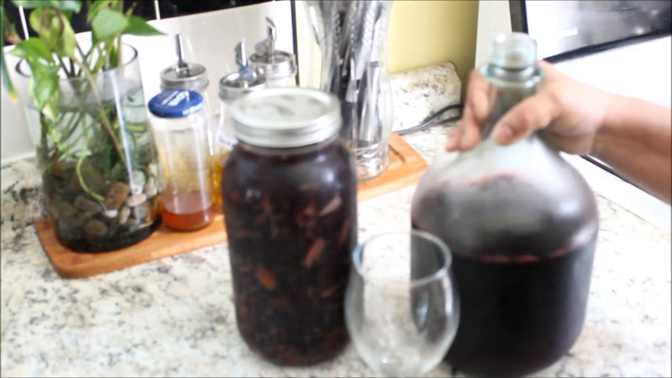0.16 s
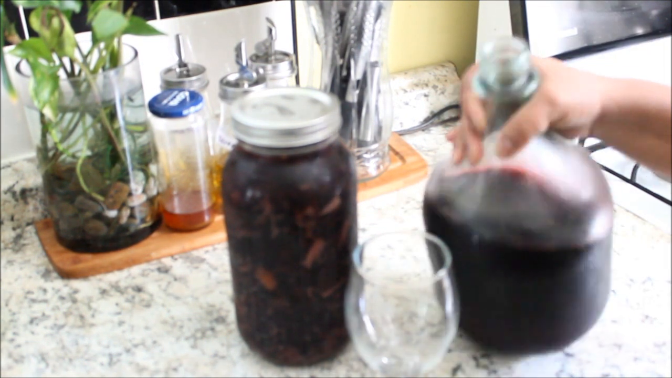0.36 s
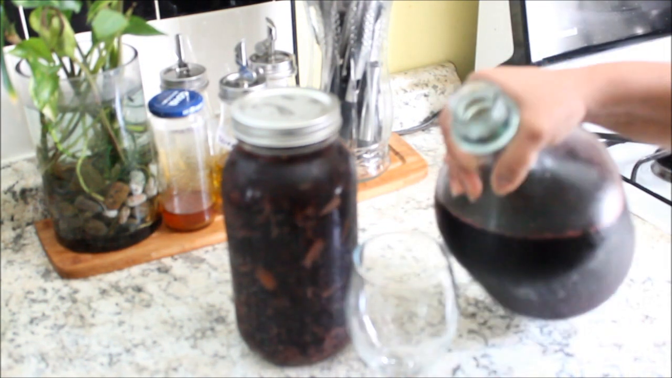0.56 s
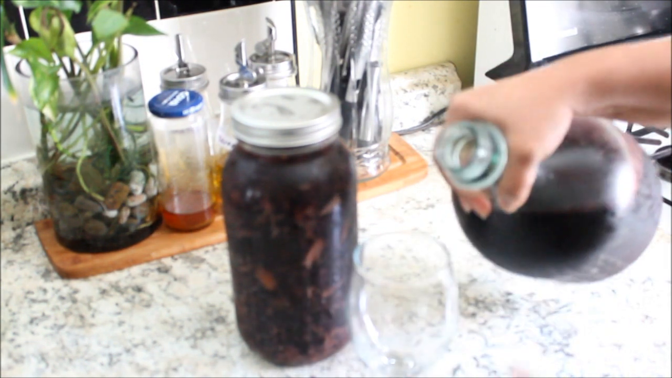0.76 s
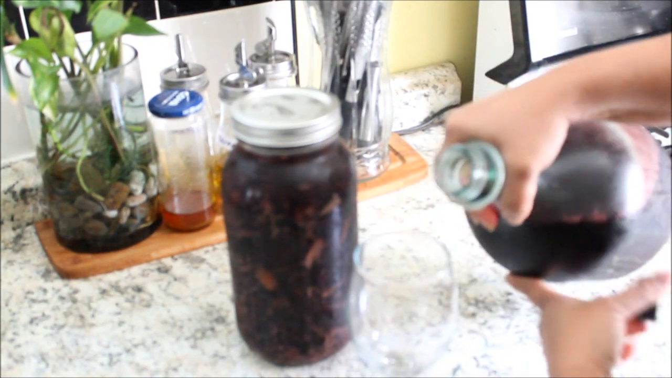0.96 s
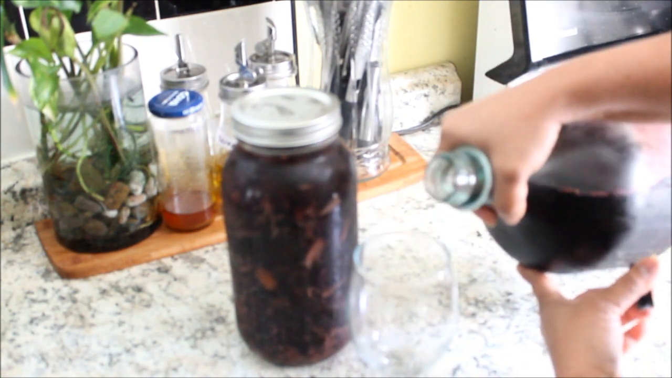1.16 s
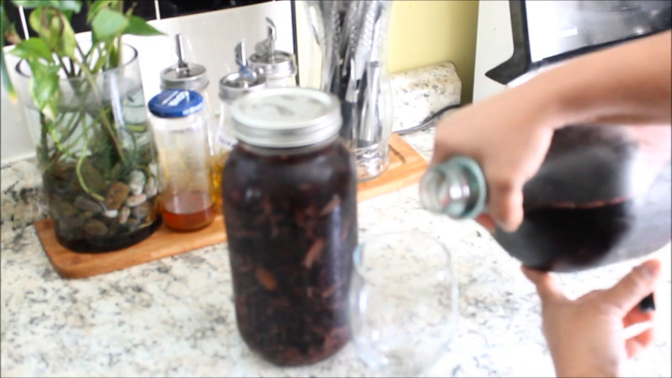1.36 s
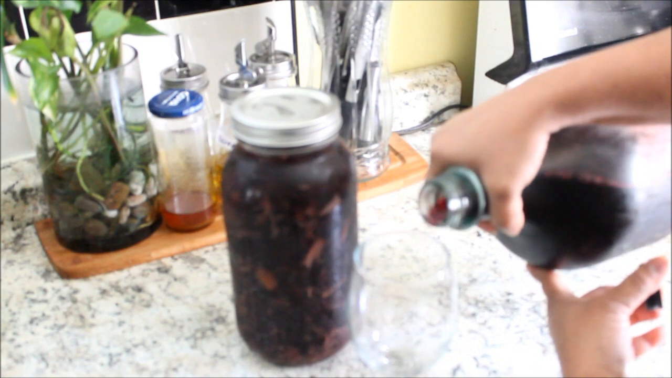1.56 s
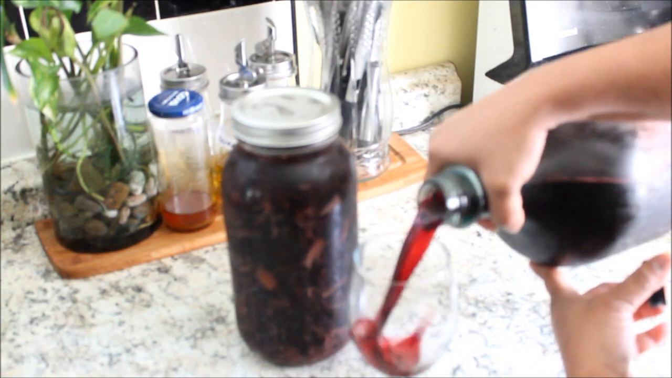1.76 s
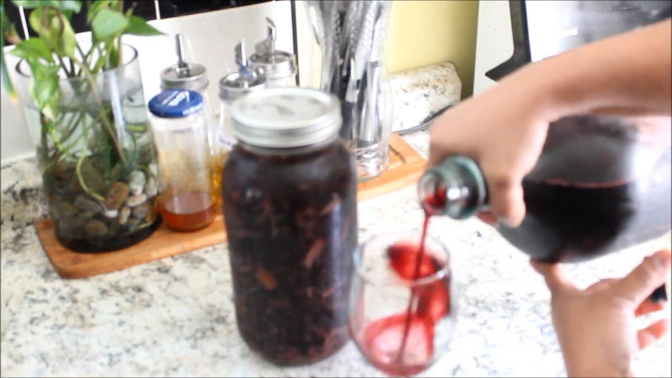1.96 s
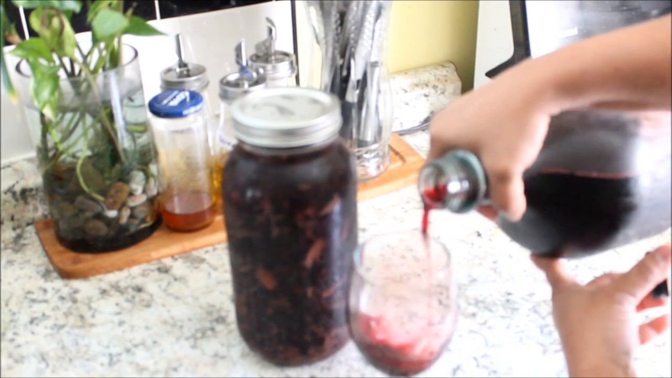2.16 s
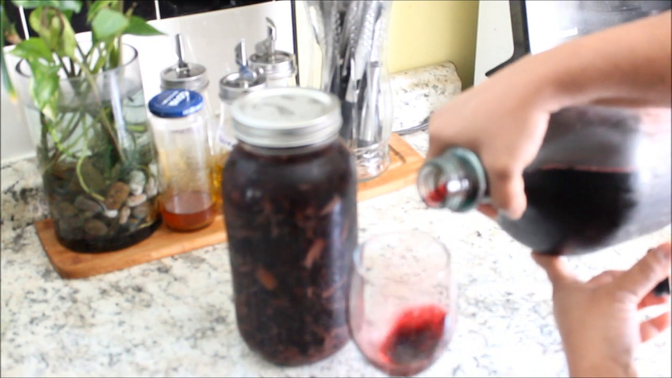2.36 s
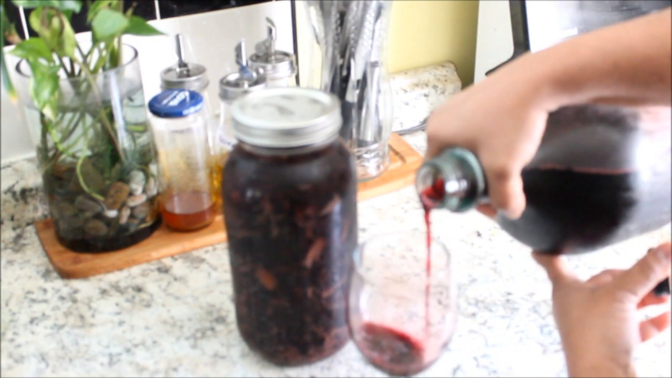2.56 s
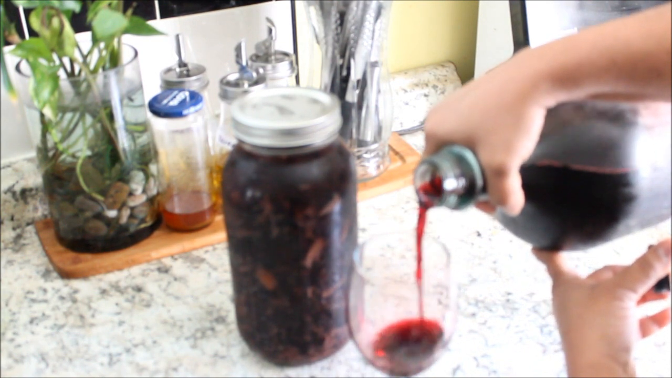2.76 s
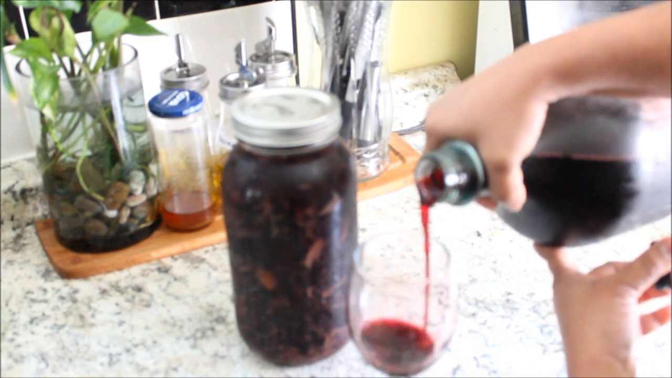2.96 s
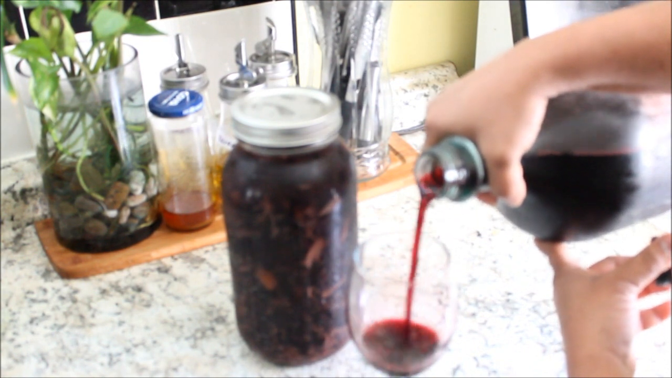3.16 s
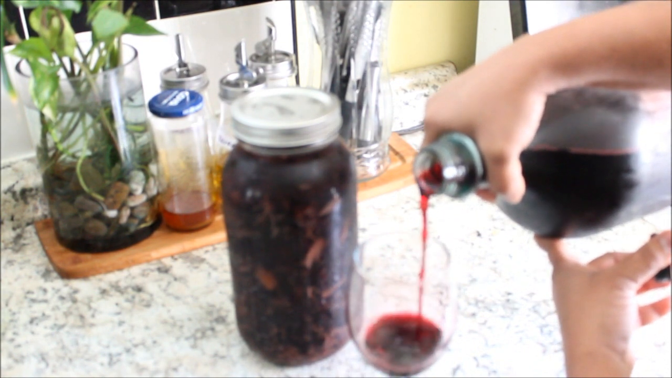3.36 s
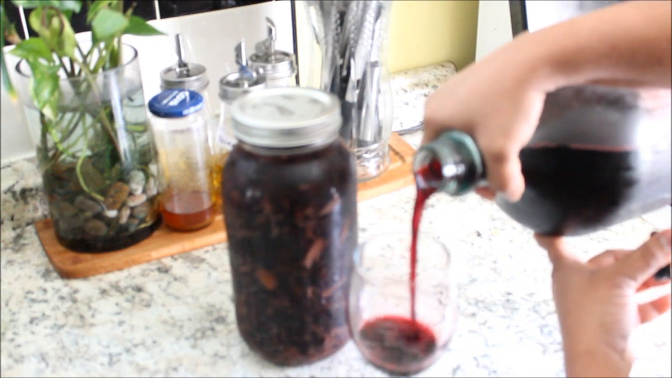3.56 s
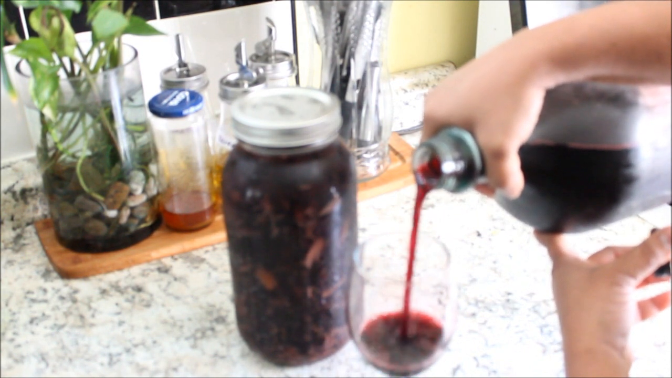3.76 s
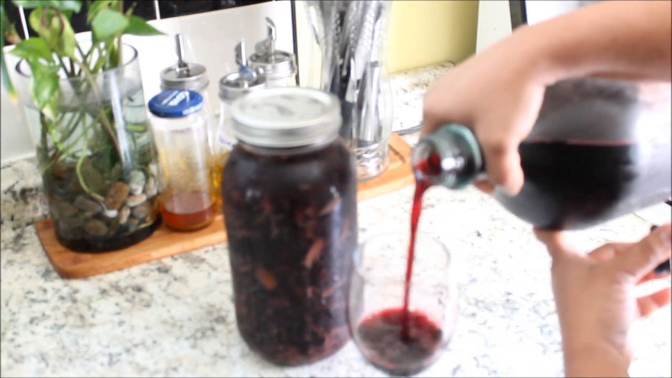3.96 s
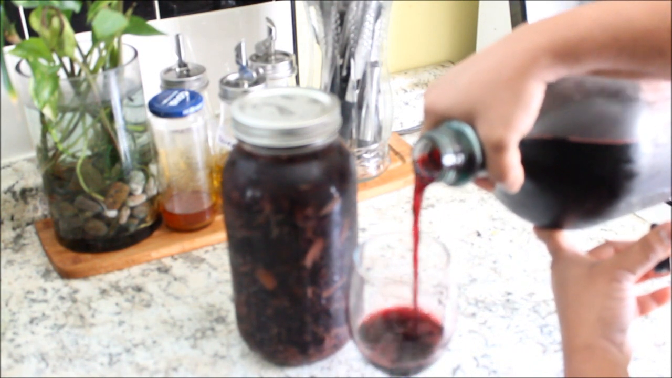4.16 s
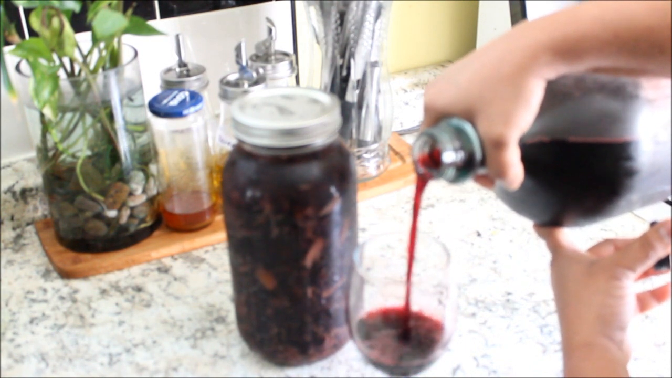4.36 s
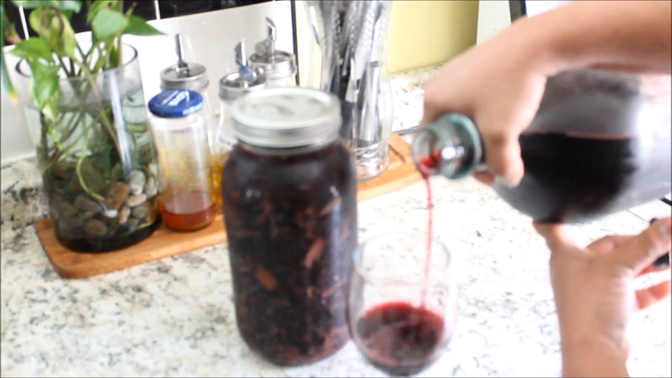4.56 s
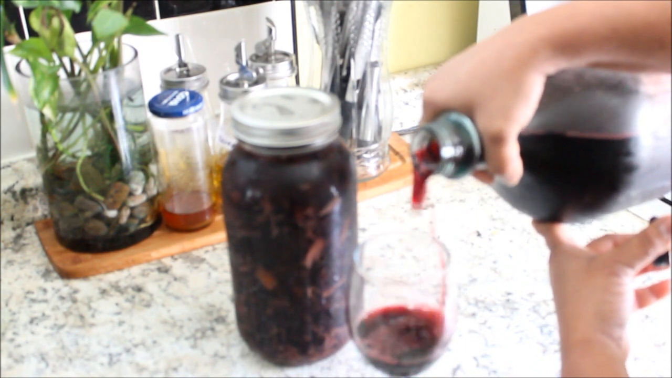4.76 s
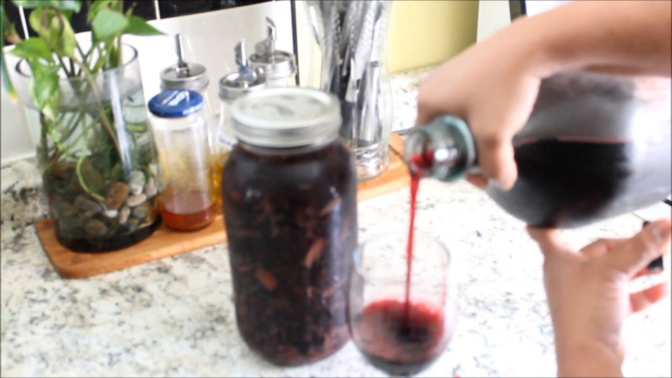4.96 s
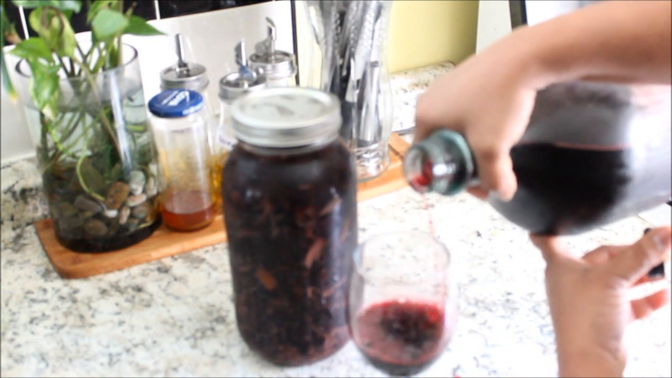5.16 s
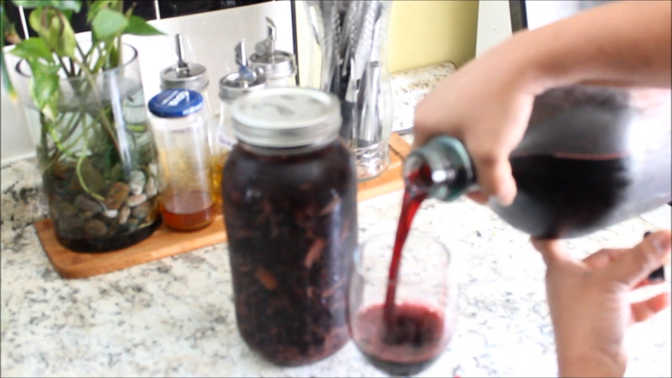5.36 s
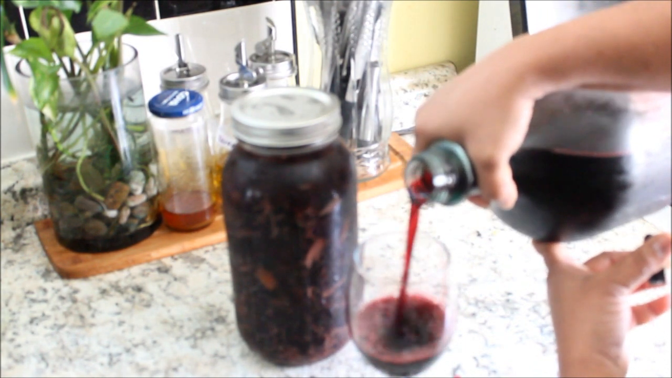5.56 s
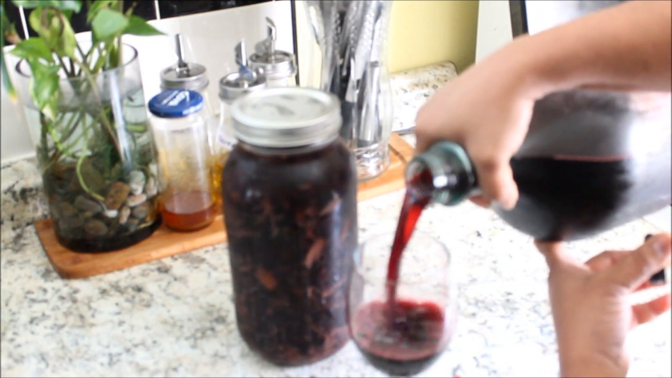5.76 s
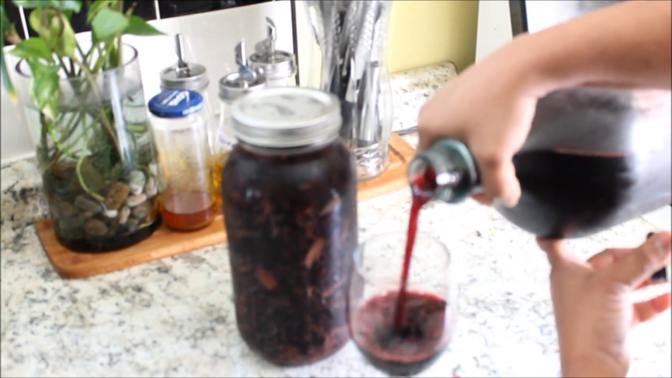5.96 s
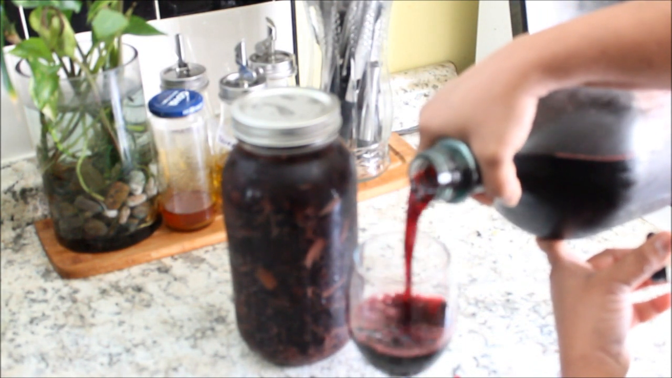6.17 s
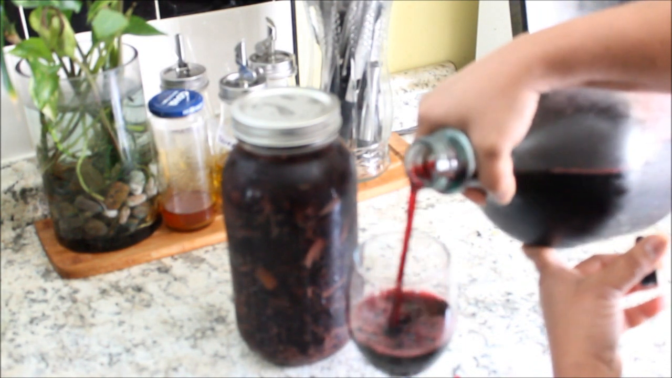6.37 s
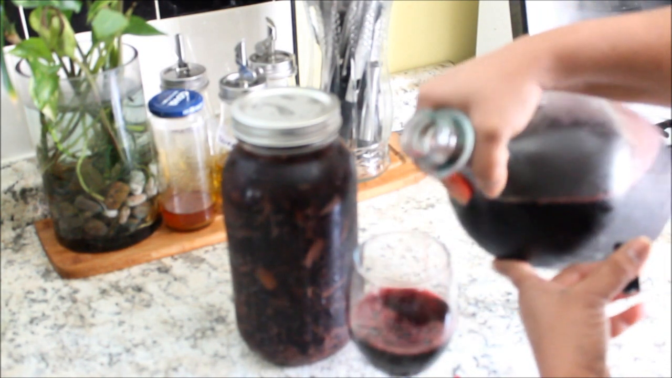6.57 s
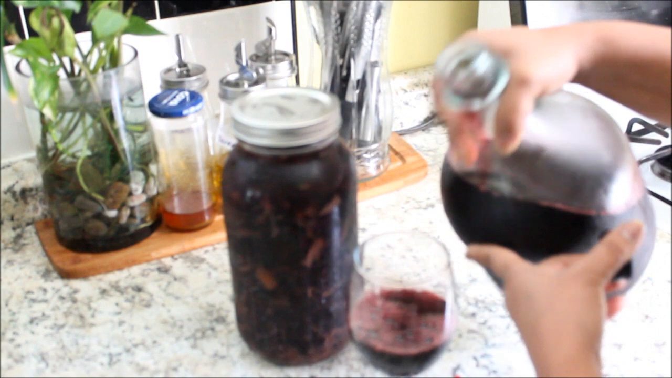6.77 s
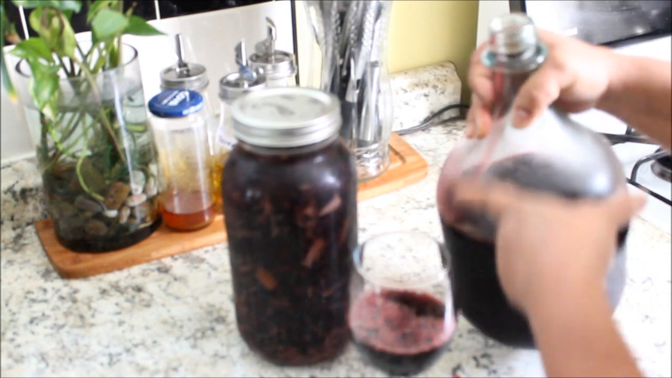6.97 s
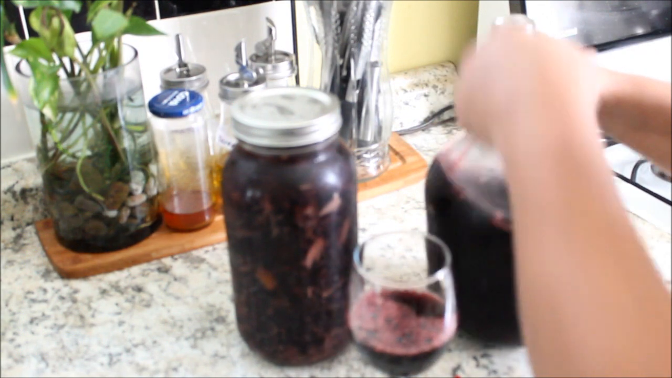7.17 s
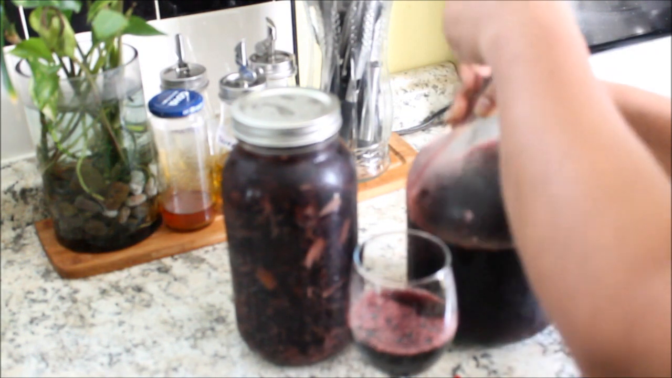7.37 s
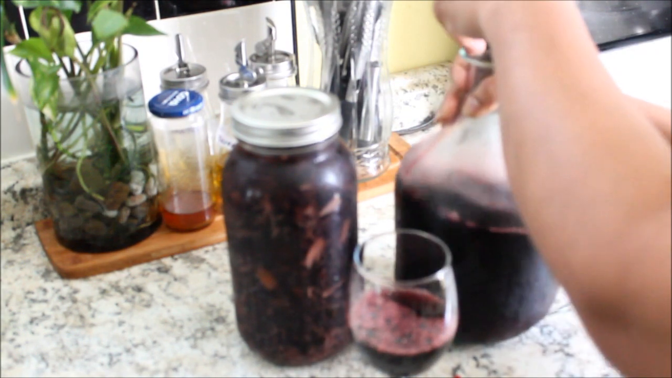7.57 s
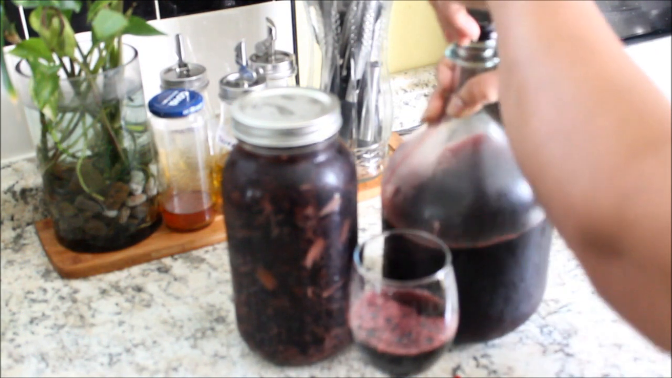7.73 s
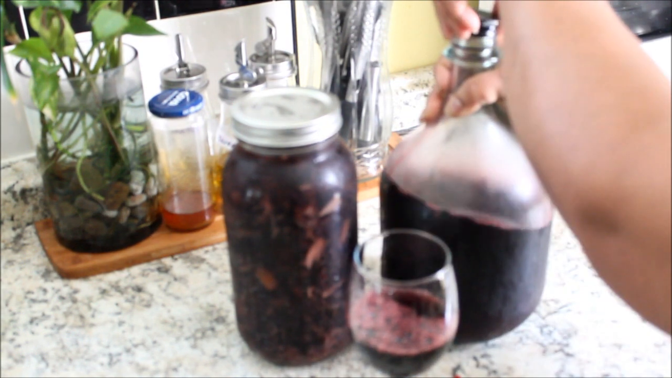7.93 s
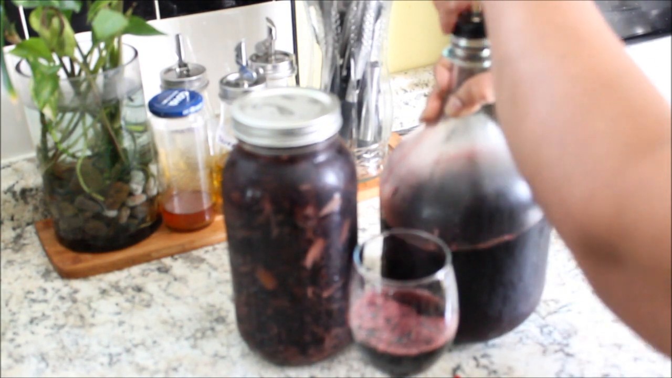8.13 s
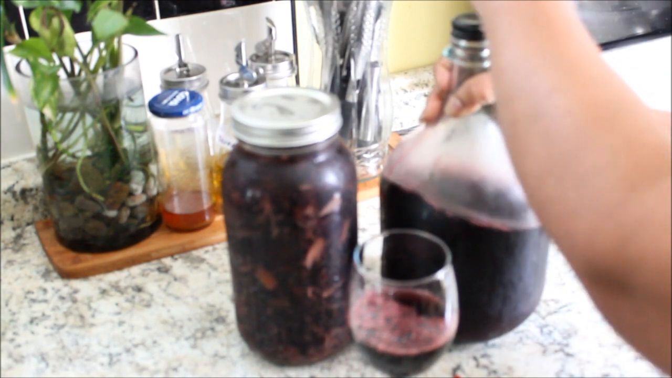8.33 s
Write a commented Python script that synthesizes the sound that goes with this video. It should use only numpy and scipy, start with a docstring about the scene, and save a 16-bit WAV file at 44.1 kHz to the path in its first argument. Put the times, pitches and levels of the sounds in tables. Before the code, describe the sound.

Close view of a small hard-walled kitchen with a low steady appliance hum. Fingers click sharply on a glass jug, its foot scrapes the stone counter, and sleeves rustle. A thin stream then pours unevenly into a glass with bubbly plinks and gurgles. Finally the jug thuds down twice, while its cap taps the lip and grinds on the thread.

```python
"""In a small hard-walled kitchen an appliance hums, made of wavering sines over coloured noise.
Fingers snap on a glass jug, its foot drags over the stone counter, sleeves rustle and a faint hiss follows.
Then a thin stream pours in surges: climbing sines are bubbles, noise bursts are drops, the glass rings along.
At the end the jug lands twice, as struck resonances and fading noise, while its cap knocks on the lip
and is screwed on, as clicks sent through thin-metal resonances."""
import sys
import numpy as np
from scipy import signal
from scipy.fft import rfft, irfft
from scipy.io import wavfile
from scipy.ndimage import map_coordinates

SR = 44100
rng = np.random.default_rng(int(sys.argv[2]) if len(sys.argv) > 2 else 0)


def master_out(mix):
    """Clip the mix to full scale and print it as 16-bit PCM to the path in sys.argv[1]."""
    frames = np.transpose(np.atleast_2d(mix))
    ceiling = np.clip(frames, -1, 1)
    pcm = np.round(ceiling * 32767).astype(np.int16)
    wavfile.write(sys.argv[1], SR, pcm)


N = 370440   # length in samples

# ringing tones of the jug's lip: [f/Hz, strength/dB, time to fade by 60 dB/s]
LIP_MODES = [(2177, -2, .045), (2317, 0, .05), (2464, 0, .045), (2740, -7, .03), (3774, -21, .12),
             (3300, -14, .012), (4300, -17, .012), (4969, -12, .015), (5421, -12, .03), (7084, -12, .02)]


def from_db(db):
    """Turns decibels into a gain: every 20 dB is a factor of ten."""
    return 10 ** (np.asarray(db) / 20)


def rms_one(x):
    """Scales a sound so that its average strength (rms) is 1."""
    return x / np.sqrt(np.mean(x ** 2) + 1e-20)


def in_time(rows):
    """Joins timed points by straight lines, one value a sample; practically silent outside the table."""
    s, *columns = np.transpose(rows)
    t = np.arange(N) / SR
    return [np.interp(t, s, column, left=-150, right=-150) for column in columns]


def at_hz(points, hz):
    """Reads a table between its points on a log-frequency axis, as the ear spaces pitch."""
    table_hz, values = np.array(points).T
    return np.interp(np.log(hz), np.log(table_hz), values)


def coloured(x, spectrum):
    """Weights the frequencies of an even-spectrum sound by a table, then scales it to rms 1."""
    hz = np.arange(len(x) // 2 + 1) * SR / len(x) + 1
    return rms_one(irfft(rfft(x) * from_db(at_hz(spectrum, hz)), len(x)))


def drift(rate):
    """Slow random wandering: a smooth curve through random points, `rate` of them a second."""
    knots = rng.standard_normal(round(N / SR * 60) + 3)
    return map_coordinates(knots, [np.arange(N) / SR * min(rate, 59)], order=3)


def resonate(x, hz, width_hz):
    """One resonance with gain 1 at about its peak: a narrow one rings long, a wide one briefly."""
    r = np.exp(-np.pi * width_hz / SR)
    forward = [(1 - r * r) / 2, 0, (r * r - 1) / 2]
    feedback = [1, -2 * r * np.cos(2 * np.pi * hz / SR), r * r]
    return signal.lfilter(forward, feedback, x + 1e-18)


def grains(per_s, spread_db):
    """Clicks at random moments, of uneven size and random sign, as rough contact makes; rms 1."""
    sizes = from_db(spread_db * np.minimum(rng.exponential(1, N), 5)) * rng.choice([-1, 1], N)
    return rms_one(sizes * (rng.random(N) < per_s / SR))


def add(out, s, sound):
    """Mixes a sound in, starting at a time in seconds."""
    i = round(s * SR)
    out[i:i + len(sound)] += sound[:N - i]


def dying_noise(decay, spectrum):
    """Half a second of noise in half-octave bands, each fading at its own rate."""
    t, out = np.arange(SR // 2) / SR, 0
    for low in 40 * 2 ** np.arange(0, 8.6, .5):
        hz = low * 2 ** .25   # middle of the band
        band_filter = signal.butter(2, [low, low * np.sqrt(2)], "band", fs=SR, output="sos")
        band = signal.sosfilt(band_filter, rng.standard_normal(len(t)))
        out = out + band * from_db(at_hz(spectrum, hz) - 60 * t / at_hz(decay, hz))
    return out / np.sqrt(np.mean(out[:SR // 50] ** 2))   # the first 20 ms have rms 1


def strike(force, modes):
    """A force sets a body's tones ringing; each strength also gets a random change in dB."""
    out = 0
    for hz, db, t60 in modes:
        r, w = from_db(-60 / (t60 * SR)), 2 * np.pi * hz / SR
        ring = signal.lfilter([0, np.sin(w)], [1, -2 * r * np.cos(w), r * r], force)
        out = out + from_db(db + rng.normal(0, 2.94)) * ring
    return out


def slap(db, hz, t60, breadth):
    """A short fading noise burst, twice through one resonance; breadth = width over centre."""
    burst = rng.standard_normal(2000) * from_db(-60 * np.arange(2000) / SR / t60)
    burst = resonate(resonate(burst, hz, hz * breadth), hz, hz * breadth)
    return from_db(db) * burst / np.abs(burst).max()


def strokes(rows, rise_s, sag_db, fall_s):
    """Level curve/dB: each stroke rises 40 dB, sags, falls 40 dB; where strokes overlap the loudest rules."""
    out, t = np.full(N, -150.), np.arange(N) / SR
    for s, length, db in rows:
        corners = [s - rise_s, s, s + length, s + length + fall_s]
        i, j = np.searchsorted(t, [corners[0], corners[-1]])
        shape = np.interp(t[i:j], corners, [-40, 0, -sag_db, -sag_db - 40])
        out[i:j] = np.maximum(out[i:j], db + shape)
    return out


def background():
    """Room noise, and a motor's hum and faint whine: sines that waver in level and phase."""
    # room noise colour: [f/Hz, relative level/dB]
    air_colour = [(15, -62), (25, -35), (65, -25.5), (97, -29.5), (154, -14.5), (176, -18.5), (196, -4),
                  (264, -11.5), (419, -10), (467, -19), (535, -18), (2570, -33), (3030, -34), (10500, -43),
                  (16300, -51.5)]
    # motor tones: [f/Hz, middle rms level/dB]
    hum_tones = [(195.1, -46), (100.5, -67.5), (401, -66.5), (3100, -72)]
    t, hum = np.arange(N) / SR, 0
    for hz, db in hum_tones:
        level = np.sqrt(2) * from_db(db + 1.4 * drift(5.8))   # a sine's peak is sqrt(2) times its rms
        hum = hum + level * np.sin(2 * np.pi * hz * t + 0.42 * drift(7.8))
    air_db = -46.5 + 0.09 * drift(3.94)
    return hum + from_db(air_db) * coloured(rng.standard_normal(N), air_colour)


def rustle():
    """Sleeves and skin slide as dense coloured clicks; resonant noise hisses while the jug tips."""
    # cloth colour: [f/Hz, relative level/dB]
    cloth_colour = [(290, -56), (500, 3.5), (553, -41), (688, -1.5), (795, -5), (1280, -8), (1440, -3.5),
                    (7640, 1), (16000, -21)]
    # one swish a row: [start t/s, length/s, level/dB]
    swishes = [(.04, 0.28, -38), (.5, .17, -39.5), (.96, 0.088, -36.5), (1.22, 0.033, -50),
               (1.45, 0.041, -56), (1.64, 0.024, -57), (1.95, 0.11, -80), (6.85, 0.19, -52),
               (7.08, 0.32, -48.5), (7.425, 0.026, -38), (7.62, 0.3, -51.5), (8.11, 0.017, -54),
               (8.23, 0.095, -54.5)]
    # hiss while the jug tips: [t/s, level/dB]
    tipping_level = [(1.12, -59), (1.156, -61), (1.23, -50), (1.506, -54), (1.63, -66), (1.636, -77),
                     (1.676, -78), (1.7, -71)]
    # resonances of that hiss: [f/Hz, width/Hz, relative level/dB]
    hiss_bands = [(2030, 460, 4), (4070, 300, -7), (3140, 52, -22)]
    noise = rng.standard_normal(N)
    hiss = rms_one(sum(from_db(db) * resonate(noise, hz, width) for hz, width, db in hiss_bands))
    cloth = coloured(grains(9000, spread_db=-1.0), cloth_colour)
    cloth_db = strokes(swishes, rise_s=0.35, sag_db=2.5, fall_s=.22) + 0.16 * drift(15)
    return from_db(cloth_db) * cloth + from_db(in_time(tipping_level)[0]) * hiss


def snaps():
    """Fingers on glass and cap: a sharp click rings around its centre, with noise and a bright edge."""
    # one snap a row: [t/s, level of the ring/dB, centre f/Hz, bright edge relative to the ring/dB]
    snap_rows = [(0.0353, -13.5, 3600, -28), (.0423, -15.5, 3600, -5), (0.123, -17.5, 6960, -12),
                 (0.162, -16, 1510, -2), (0.5367, -17.5, 2870, -35), (0.981, -22.5, 2930, -9),
                 (1.061, -17.5, 1490, 0.5), (1.83, -38, 10000, -12), (7.12, -30.5, 5440, -12),
                 (7.3613, -16.5, 3000, 0), (7.693, -28.5, 1340, -30), (7.695, -35, 5000, -25),
                 (7.744, -29.5, 5300, -22), (7.81, -34, 2980, -26), (7.848, -35, 3400, -18),
                 (8.0335, -39, 2780, -8)]
    out, click = np.zeros(N), np.r_[1., -1., np.zeros(300)]
    for s, db, hz, edge_db in snap_rows:
        ring = resonate(click, hz, 1.5 * hz)
        add(out, s, from_db(db) * ring / np.abs(ring).max())
        body = slap(db - 4, hz, 0.031, breadth=0.81)
        edge = slap(db + edge_db, 6000, 0.0074, breadth=0.51)
        add(out, s, body + edge)
    return out


def cap():
    """The cap knocks on the lip, then rubs on the thread: dense clicks make thin metal resonate."""
    # knocks on the lip: [t/s, level before the ringing/dB]
    knocks = [(7.3964, -28), (7.42, -32), (7.4245, -22.5), (7.429, -17.5), (7.436, -39), (7.4444, -36),
              (7.4564, -28)]
    # resonances of the cap: [f/Hz, width/Hz, relative level/dB]
    cap_bands = [(1290, 390, -8.5), (1830, 280, -3.5), (2180, 89, 7), (2160, 81, -21), (2930, 110, -13),
                 (3660, 190, -12.5), (4500, 310, -19), (6300, 790, -26)]
    # grinding on the thread, one turn a row: [start t/s, length/s, level/dB]
    turns = [(7.424, 0.0069, -24.5), (7.445, 0.023, -51), (7.685, 0.04, -43.5), (8.036, 0.027, -38.5),
             (8.085, 0.041, -37), (8.22, 0.056, -33), (8.27, 0.026, -34.5)]
    out = np.zeros(N)
    for s, db in knocks:
        tap = np.r_[slap(-12, 3000, .012, breadth=1.5), np.zeros(SR // 5)]   # gritty contact of a few ms
        add(out, s, from_db(db) * strike(tap, LIP_MODES))
    clicks = grains(1000, spread_db=1.5)
    rings = sum(from_db(db) * resonate(clicks, hz, width) for hz, width, db in cap_bands)
    turn_db = strokes(turns, rise_s=0.022, sag_db=1.5, fall_s=0.04)
    return out + from_db(turn_db) * rms_one(rings)


def jug():
    """The foot drags as gritty clicks; landings and bounces crack, ring the counter and rumble away."""
    # landings and bounces: [t/s, level before mixing/dB, gain at the lowest pitches/dB]
    landings = [(7.2723, -8, 10.5), (7.288, -16.5, 9), (7.315, -18, 13), (7.499, -0.5, -5),
                (7.534, -14.5, -2)]
    # ringing tones of the counter: [f/Hz, strength/dB, time to fade by 60 dB/s]
    counter_modes = [(87.4, -21, 0.63), (124, -8.5, 0.4), (236.8, 2, 0.49), (347, -20, 0.24),
                     (388, -25, 0.26), (436.4, 3.5, 0.35), (568.7, 6, 0.21), (770, -15, 0.47),
                     (980, 0, 0.31), (1276, -13, 0.44), (1490, -13.5, 0.59), (1840, -15, .2),
                     (2970, -12, 0.38), (3880, -14, 0.36)]
    # colour of rumble and drag: [f/Hz, relative level/dB]
    thud_colour = [(24, -49), (40, -1.5), (163, -12), (220, -0.5), (402, 1.5), (630, -12), (770, -2),
                   (1090, -12), (1720, -15.5), (2700, -29), (3740, -31), (16000, -65.5)]
    # fading of the rumble: [f/Hz, time to fade by 60 dB/s]
    thud_decay = [(60, 0.11), (250, 0.3), (1000, 0.24), (3000, 0.37), (12000, 0.087)]
    # the foot drags over the counter: [t/s, level/dB]
    drag_level = [(0.3, -59), (0.304, -51), (0.368, -31), (0.46, -41), (0.472, -68), (0.5, -56)]
    out, blow = np.zeros(N), np.zeros(SR // 2)
    blow[:10] = np.hanning(10) / 5   # a quarter millisecond of hard contact
    crack = from_db(-60 * np.arange(SR // 2) / SR / 0.022)
    bass_filter = signal.butter(1, 223, fs=SR)   # passes what lies below about 223 Hz
    for s, db, bass_db in landings:
        rumble = dying_noise(thud_decay, thud_colour) * (1 + 3.3 * crack)
        hit = from_db(db - 20) * strike(blow, counter_modes) + from_db(db - 10.0) * rumble
        bass = signal.lfilter(*bass_filter, hit)
        add(out, s, hit + (from_db(bass_db) - 1) * bass)
    # grit under the foot: sharp and dull catches, coloured by the same slab
    sharp = np.gradient(grains(900, spread_db=4.0)) * 6
    dull = grains(900, spread_db=-3.0)
    drag_db = in_time(drag_level)[0]
    out += from_db(drag_db) * coloured(sharp + dull, thud_colour)
    # the glass rings faintly while the foot drags
    out += from_db(drag_db - 18) * rms_one(strike(grains(900, spread_db=4.0), LIP_MODES))
    # thin out the jug's sounds below about 85 Hz
    return signal.sosfilt(signal.butter(5, 85, "high", fs=SR, output="sos"), out)


def bubble(db, hz, t60, rise, swell_cycles):
    """A bubble near the surface: a sine that swells, climbs in pitch and dies by 60 dB in t60 seconds."""
    t = np.arange(round(t60 * SR)) / SR
    envelope = (1 - np.exp(-t * hz / swell_cycles)) * from_db(-60 * t / t60)
    return from_db(db) * envelope / envelope.max() * np.sin(2 * np.pi * hz * (t + rise * t * t / t60))


def froth(level_db, low_hz, high_hz, count, cycles, glide, lean):
    """Many small bubbles at random moments, uneven in size, life and climb, follow the stream's level."""
    stream_start_s, stream_end_s = 1.95, 6.8
    out = np.zeros(N)
    for when, pitch, size, life, climb in rng.random((count, 5)):
        s = stream_start_s + when * (stream_end_s - stream_start_s)
        hz = low_hz * (high_hz / low_hz) ** (pitch ** lean)   # lean below 1 favours high pitches
        db = level_db[round(s * SR)] - 5.8 * np.log(1 - .98 * size)   # few are much louder
        t60 = cycles / hz * (.5 + 1.56 * life)
        add(out, s, bubble(db, hz, t60, glide * climb ** 2, swell_cycles=0.61))
    return out


def single_bubbles():
    """The loudest bubbles ring one by one, each with a noisy burst; higher ones generally fade sooner."""
    # one bubble a row: [t/s, peak level of its sine before the glass/dB, starting f/Hz]
    bubble_rows = [(2.01, -38.5, 5000), (2.053, -43, 4500), (2.102, -32, 4020), (2.1308, -16, 2535),
                   (2.168, -30, 1470), (2.3687, -23.5, 2500), (2.402, -34, 1060), (2.449, -29, 1340),
                   (2.4596, -35.5, 5600), (2.7006, -27.5, 2270), (2.749, -23, 1194), (2.7727, -35, 2750),
                   (2.897, -34, 1020), (2.948, -28.5, 3520), (2.995, -32.5, 2290), (3.006, -32, 1110),
                   (3.0225, -30.5, 6330), (3.0789, -22, 2390), (3.081, -28.5, 1050), (3.1777, -29.5, 2360),
                   (3.254, -35, 710), (3.284, -30.5, 747), (3.2908, -38, 2540), (3.3186, -33, 2360),
                   (3.329, -28.5, 828), (3.388, -30, 760), (3.45, -32, 2745), (3.464, -24.5, 717),
                   (3.5, -19.5, 787), (3.564, -25.5, 810), (3.6044, -37, 6400), (3.6929, -32.5, 5300),
                   (3.2, -39, 786), (3.69, -30.5, 668), (3.729, -18, 613), (3.775, -29, 4800),
                   (3.8063, -26.5, 5180), (3.889, -29, 620), (3.948, -31, 4920), (3.952, -31, 1180),
                   (4.0296, -24, 2820), (4.057, -37, 493), (4.2613, -29.5, 6330), (4.29, -30, 860),
                   (4.408, -33, 820), (4.41, -37, 2820), (4.4787, -31.5, 5100), (4.525, -28.5, 4780),
                   (4.5602, -29, 3000), (4.44, -32, 410), (4.625, -37, 386), (4.689, -33.5, 390),
                   (4.645, -37, 2340), (4.668, -37, 1124), (4.678, -28, 3120), (4.719, -32.5, 1136),
                   (4.934, -29, 5170), (4.935, -36, 2810), (5.002, -23, 3740), (5.006, -30, 343),
                   (5.014, -22, 355), (5.047, -35, 384), (5.1, -35, 394), (5.108, -28, 820),
                   (5.118, -23, 827), (5.14, -32.5, 850), (5.1715, -30.5, 2140), (5.202, -29, 960),
                   (5.2007, -38, 2660), (5.239, -27, 2370), (5.241, -30.5, 953), (5.2562, -29, 2580),
                   (5.4583, -33, 3180), (5.465, -36, 4410), (5.48, -42.5, 807), (5.532, -36, 2800),
                   (5.5668, -29.5, 2320), (5.568, -39, 826), (5.643, -27.5, 940), (5.6697, -30.5, 3180),
                   (5.67, -25.5, 830), (5.744, -32.5, 3130), (5.8001, -30, 2520), (5.8677, -27, 4100),
                   (5.884, -24, 890), (5.9016, -21, 2990), (5.922, -26.5, 832), (5.97, -35, 800),
                   (5.9588, -32, 2510), (6.042, -29.5, 870), (6.066, -25.5, 6480), (6.154, -27, 7000),
                   (6.1, -29.5, 900), (6.159, -25.5, 975), (6.17, -34, 410), (5.6, -34, 1140),
                   (6.181, -23.5, 6800), (6.3, -42, 1104), (6.354, -35, 930), (6.425, -35.5, 964),
                   (6.411, -31, 3200), (6.442, -33, 2500), (6.505, -31, 1200), (6.5429, -28, 2380),
                   (6.544, -22.5, 950), (6.612, -31.5, 3350), (6.621, -34.5, 1143), (6.701, -38, 2260)]
    # values for a 1 kHz bubble; each scales as a power of pitch
    ring_t60_s, burst_t60_s, fade_power, longest_s = 0.062, 0.09, -.7, 0.058   # longest caps both fades
    climb_at_1k, climb_power, swell_cycles_at_1k, swell_power = 0.049, 0.39, 0.23, -0.29
    out = np.zeros(N)
    for s, db, hz in bubble_rows:
        khz = hz / 1000
        ring_s = min(ring_t60_s * khz ** fade_power, longest_s)
        burst_s = min(burst_t60_s * khz ** fade_power, longest_s)
        rise = climb_at_1k * khz ** climb_power * rng.uniform(0.26, 2.33)
        add(out, s, bubble(db, hz, ring_s, rise, swell_cycles_at_1k * khz ** swell_power))
        add(out, s, slap(db - 2.5, hz, burst_s, breadth=0.63))
    return out


def pouring():
    """Bubbles, froth, spray and slapping drops, with the glass and its air ringing at their own pitches."""
    # surges of the stream: [start t/s, length/s, gurgle level/dB, fizz level/dB]
    surges = np.array([(2.142, 0.033, -48, -26), (2.367, 0.019, -37, -28.5), (2.447, .03, -64, -43),
                       (2.71, 0.033, -58, -38), (2.745, 0.14, -41.5, -37.5), (2.903, 0.41, -46, -46),
                       (3.072, 0.27, -42.5, -40), (3.26, 0.09, -38.5, -36), (3.388, 0.071, -34, -30),
                       (3.496, 0.22, -45.5, -34), (3.739, 0.061, -28, -30.5), (3.883, 0.23, -36, -38.5),
                       (4.033, 0.047, -36, -34), (4.153, 0.084, -35, -37.5), (4.289, 0.088, -39.5, -43),
                       (4.374, 0.21, -36.5, -37.5), (4.628, 0.11, -33.5, -32.5), (5.009, 0.089, -29, -39.5),
                       (5.1, 0.046, -33, -47), (5.15, 0.1, -34.5, -40), (5.483, 0.19, -37, -40.5),
                       (5.655, 0.11, -30, -36), (5.848, .02, -45, -38), (5.881, 0.039, -29, -31),
                       (5.95, 0.065, -38, -42), (6.024, 0.23, -32, -38), (6.14, 0.19, -40, -38.5),
                       (6.363, 0.36, -46.5, -45), (6.508, 0.09, -32.5, -42)])
    # drops slapping the surface: [t/s, level before the glass/dB, centre f/Hz]
    splats = [(2.1297, -20.5, 6300), (2.167, -25, 6660), (2.3737, -23.5, 6940), (2.7, -32, 7700),
              (2.751, -24, 8150), (2.9451, -28.5, 8660), (2.9945, -31, 6330), (3.0774, -26, 6200),
              (3.3184, -23.5, 8200), (3.3896, -15.5, 9700), (3.488, -25.5, 7700), (3.5723, -27.5, 6240),
              (3.6046, -23.5, 6740), (3.7288, -24.5, 7000), (4.0324, -23, 7920), (4.1564, -34, 7100),
              (4.2265, -30, 7840), (4.291, -21, 7150), (4.388, -30, 8700), (4.5874, -29, 8100),
              (4.6234, -26.5, 8900), (4.645, -28, 11000), (4.934, -21.5, 6230), (5.036, -25.5, 6560),
              (5.069, -24.5, 7200), (5.1227, -24.5, 8500), (5.162, -20.5, 8000), (5.4243, -32.5, 6340),
              (5.6697, -31.5, 6200), (5.7426, -29.5, 6640), (5.8774, -32, 6220), (6.047, -36, 6310),
              (6.1024, -36, 8000), (6.129, -32, 8000), (6.1528, -32, 9000), (6.181, -31, 9000),
              (6.2426, -28, 8150), (6.486, -32, 11800), (6.542, -24, 7250), (6.5685, -20, 8300),
              (6.6116, -27, 7740), (6.6876, -28.5, 6010)]
    # air and wall of the drinking glass: [f/Hz, width/Hz, level/dB]
    glass_bands = [(345, 74, 1), (794, 70, 2), (1133, 130, -8.5), (1780, 29, -5), (2340, 22, -13),
                   (2756, 90, -0.5), (980, 31, -8), (3930, 210, -6), (4530, 570, -7.5), (5420, 45, 1)]
    gurgle_db, fizz_db = (strokes(surges[:, [0, 1, k]], rise_s=0.037, sag_db=11, fall_s=0.097)
                          for k in (2, 3))
    # spray follows the fizz and is scattered by the drops
    scatter_db = strokes([(s, .01, db - 26) for s, db, hz in splats], 0.0067, 0, fall_s=0.24)
    spray_db = np.maximum(fizz_db - 14, scatter_db)
    froth_under_db = -13   # a small bubble's least level against the surge
    water = froth(gurgle_db + froth_under_db, 381, 1320, count=2200, cycles=17.4, glide=0.34, lean=0.708)
    water += froth(fizz_db + froth_under_db, 1910, 6170, count=3200, cycles=46, glide=0.5, lean=1.205)
    water += froth(spray_db, 5800, 16300, count=3500, cycles=11.0, glide=0.21, lean=0.99)
    water += single_bubbles()
    for s, db, hz in splats:
        bright_edge = slap(db - 16, 19500, 0.024, breadth=0.2)
        add(water, s, slap(db, hz, 0.026, breadth=0.6) + bright_edge)
    ringing = sum(from_db(db) * resonate(water, hz, width) for hz, width, db in glass_bands)
    return from_db(-3.0) * water + ringing


def scene():
    """Pouring, cap and snaps stir the kitchen's echo; jug, rustle and background join without it."""
    # fading of the echo: [f/Hz, time to fade by 60 dB/s]
    kitchen_decay = [(200, 0.31), (1000, 0.29), (4000, 0.21), (14000, 0.08)]
    near, dry_snaps = pouring() + cap(), snaps()
    echo = dying_noise(kitchen_decay, [(200, 4.5), (14000, 1.4)])
    delayed_echo = np.r_[np.zeros(150), echo]   # starts 150 samples late
    into_room = near + from_db(-2) * dry_snaps   # snaps wake the room less than the rest
    wet = signal.fftconvolve(into_room, delayed_echo)[:N]
    return (near + dry_snaps + from_db(-36.5) * wet + jug() + rustle() + background())[None]


def record(dry):
    """Clips the waveform where it passes 0.99, then cuts the treble steeply."""
    top_cut = signal.cheby2(18, 70, 16450, fs=SR, output="sos")   # 70 dB down from 16450 Hz
    return signal.sosfilt(top_cut, np.clip(dry, -.99, .99))


dry = scene()
out = record(dry)
master_out(out)
```